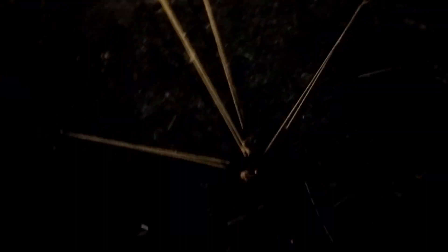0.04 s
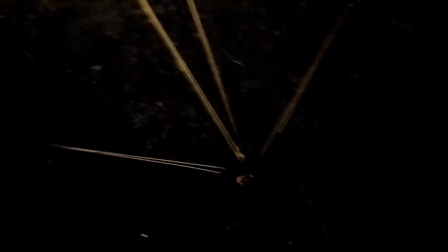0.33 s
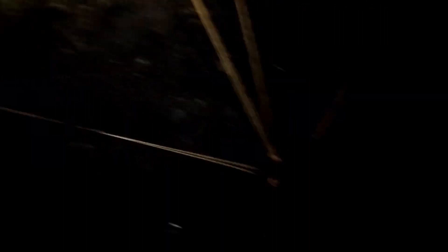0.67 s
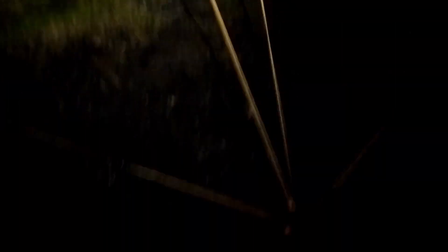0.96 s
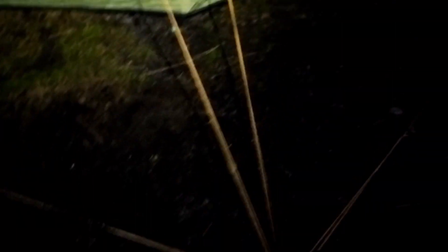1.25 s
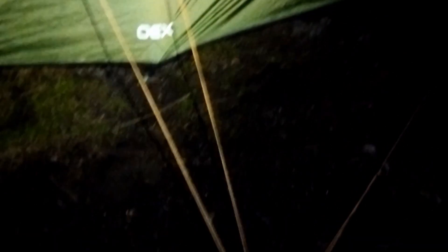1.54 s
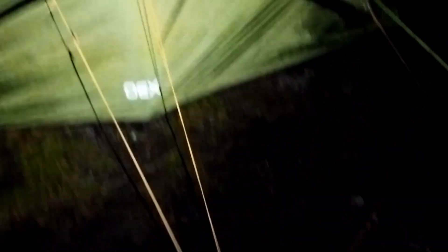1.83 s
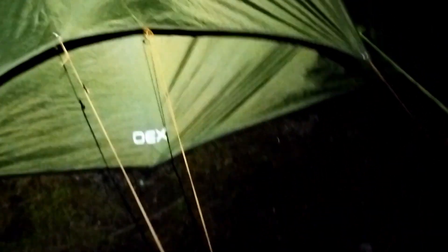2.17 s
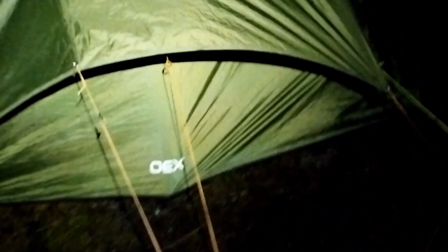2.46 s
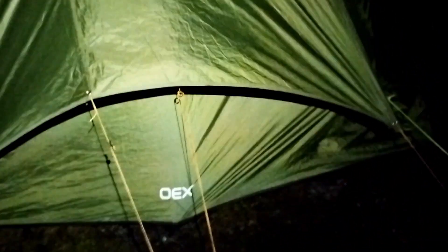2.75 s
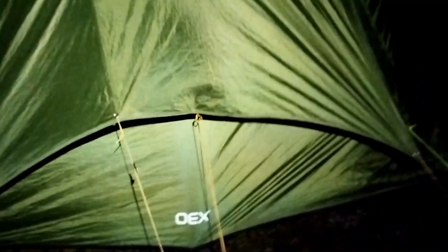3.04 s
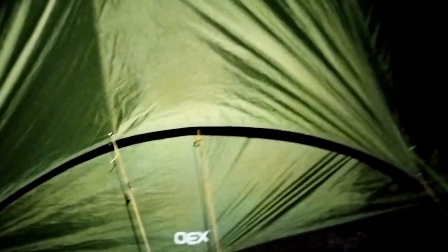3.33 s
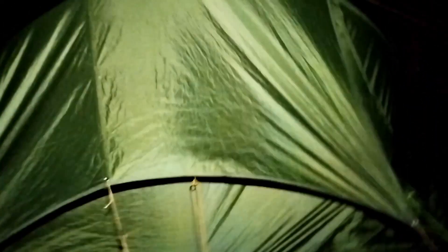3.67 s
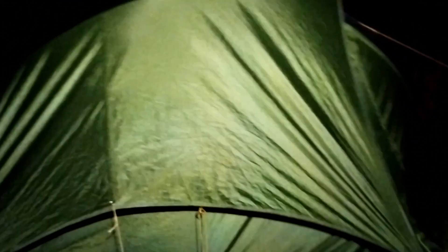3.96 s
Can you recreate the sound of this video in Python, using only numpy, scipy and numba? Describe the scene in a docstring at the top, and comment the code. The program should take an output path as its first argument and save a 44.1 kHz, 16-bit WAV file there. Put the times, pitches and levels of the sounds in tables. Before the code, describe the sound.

Tent fabric flaps and snaps in strong wind that buffets the microphone.

```python
"""Tent fabric flaps in a night gale. Each flap is a dull thump plus a burst of tiny snaps that travel
through the sheet as falling chirps. Taut creases crack or zip, the slack cloth crinkles, and the weave
hisses on sharp snaps. Eddies buffet the microphone, hardest in the first second, over a low wind
rumble, and a fast limiter holds the peaks down."""
import sys
import numpy as np
from scipy import signal
from scipy.fft import rfft, irfft, next_fast_len
from scipy.io import wavfile
from scipy.ndimage import uniform_filter1d, minimum_filter1d
from numba import njit

SR = 44100
rng = np.random.default_rng(int(sys.argv[2]) if len(sys.argv) > 2 else 0)


def generate_wav(sig):
    """Save sig (samples, or channels by samples) to the path in sys.argv[1] as 16-bit PCM at SR."""
    pcm = np.round(np.clip(np.atleast_2d(sig).T, -1, 1) * 32767).astype(np.int16)
    wavfile.write(sys.argv[1], SR, pcm)


N = 176400
SNAP_SPREAD, SNAP_ORDER = 0.4, 3.76  # pitch spread in natural-log units; higher order = narrower band


def flaps(snap_trim_db=2.5, thump_trim_db=-2.5):
    """Every flap fires a run of snaps and thumps the air."""
    # flaps of the sheet: t/s, length/s, snap level/dB, snap f/Hz, thump level/dB
    hits = [(0.01, 0.028, -26, 1700, -29), (0.041, 0.1, -38, 1970, -27.5), (0.166, 0.081, -45, 2130, -36),
            (0.279, 0.038, -42.5, 1900, -30), (0.386, 0.024, -42.5, 2050, -30.5),
            (0.509, 0.04, -34, 1900, -30), (0.601, 0.018, -30, 1690, -31), (0.658, 0.026, -34.5, 1950, -25),
            (0.713, 0.024, -34, 1730, -31), (0.747, 0.048, -32, 2240, -34), (0.804, 0.12, -33.5, 2300, -26),
            (0.948, 0.021, -25.5, 2100, -24), (0.978, 0.049, -34.5, 2260, -31),
            (1.038, 0.051, -33, 1950, -28), (1.188, 0.039, -35.5, 1670, -23.5),
            (1.312, 0.047, -27.5, 2570, -33.5), (1.377, 0.059, -26.5, 3000, -50),
            (1.448, 0.093, -30.5, 3000, -52), (1.636, 0.01, -24, 2240, -39),
            (1.664, 0.025, -25.5, 2400, -49), (1.744, 0.037, -33.5, 1470, -49),
            (1.806, 0.031, -29.5, 2070, -25.5), (1.826, 0.034, -25, 3400, -37),
            (1.896, 0.013, -27, 2920, -54), (2.015, 0.015, -26, 2410, -26), (2.055, 0.044, -30, 2280, -28),
            (2.124, 0.01, -26.5, 2400, -30), (2.172, 0.094, -28.5, 2230, -32.5),
            (2.281, 0.032, -22, 3220, -28), (2.32, 0.039, -28, 2070, -35), (2.372, 0.028, -28, 2670, -38),
            (2.457, 0.011, -27, 2000, -26.5), (2.498, 0.023, -27.5, 2700, -36),
            (2.616, 0.018, -27.5, 1300, -25), (2.637, 0.017, -25.5, 2950, -53),
            (2.756, 0.011, -10.5, 2670, -20), (2.817, 0.013, -25.5, 2110, -46),
            (2.868, 0.011, -27.5, 1220, -44), (3.173, 0.026, -32, 1960, -48),
            (3.316, 0.0046, -26, 1680, -23.5), (3.351, 0.017, -32.5, 1670, -30.5),
            (3.438, 0.012, -31, 1980, -30.5), (3.456, 0.017, -28.5, 3870, -36),
            (3.57, 0.016, -29, 3970, -38.5), (3.609, 0.039, -33, 2450, -38.5),
            (3.66, 0.012, -30, 3460, -49), (3.718, 0.053, -33, 3460, -38), (3.864, 0.02, -28, 2710, -29.5),
            (3.956, 0.018, -27, 2500, -32)]
    # thump spectrum of the slack sheet: f/Hz, level/dB
    thump_eq = [(60, -25), (150, -9), (330, -4), (800, -2), (1300, -10.5), (2100, -34), (8000, -77)]
    t = np.arange(N) / SR
    snaps, thump_env = np.zeros(N), np.zeros(N)
    for start, length, db, hz, thump_db in hits:
        snaps += burst(start, length, db + snap_trim_db, hz, SNAP_SPREAD, SNAP_ORDER)
        span = slice(int(start * SR), int((start + 2 * length + .1) * SR))
        thump_env[span] += undb(thump_db + thump_trim_db) * flap_envelope(t[span] - start, length)
    return snaps + thump_env * steady(colour(rng.standard_normal(N), thump_eq), window=600)


def flap_envelope(age, length, attack_s=0.0032, release_s=0.0026, tail_db=-18, tail_s=0.017):
    """Quick attack, hold, quick release and a faint tail."""
    after = np.maximum(age - length, 0)
    tail = undb(tail_db)
    decay = (1 - tail) * np.exp(-after / release_s) + tail * np.exp(-after / tail_s)
    return np.clip(age / attack_s, 0, 1) * decay


def burst(start, length, db, hz, spread, order, per_s=1100):
    """A shuddering run of grains, with the energy of rms level db held for its length."""
    age, gains, pitch = scatter(per_s, scatter_db=5.5, spread=spread, count=204)
    gains = gains * flap_envelope(age, length) * shudder(len(age), per_s)
    gains = gains * undb(db) * np.sqrt(length * SR / np.sum(gains ** 2))
    return grains(start + age, hz * pitch, gains, order)


def shudder(count, grains_per_s, flutter_hz=111.8, depth_db=4.5):
    """The cloth tightens and slackens in uneven cycles, so snaps come in clusters."""
    cycles = np.cumsum(rng.exponential(size=count)) * flutter_hz / grains_per_s
    return undb(depth_db * np.sin(2 * np.pi * cycles))


def cracks(count=12, length_s=.0062, trim_db=-2.5):
    """A taut crease lets go all at once: a dozen snaps within a few milliseconds."""
    # single cracks: t/s, level/dB, f/Hz
    hits = [(.062, -23, 2000), (.289, -29.5, 1810), (0.583, -37, 1410), (0.933, -17, 1860),
            (1.226, -22, 2250), (1.257, -23, 1300), (1.279, -17.5, 1680), (1.288, -21.5, 2400),
            (1.301, -19.5, 3040), (1.723, -21.5, 1920), (1.946, -22, 1950), (1.982, -23, 2190),
            (2.116, -25, 2600), (2.476, -24, 3020), (2.679, -23, 1510), (2.727, -29.5, 2000),
            (2.796, -23, 2300), (2.853, -25, 1260), (2.896, -37, 1540), (2.953, -23.5, 1200),
            (2.996, -24.5, 650), (3.1, -20.5, 2440), (3.185, -27, 2300), (3.28, -22.5, 2330),
            (3.294, -26.5, 2730), (3.333, -20, 1760), (3.835, -19, 3100)]
    out = np.zeros(N)
    for time, db, hz in hits:
        age, gains, pitch = scatter(count / length_s, scatter_db=0.67, spread=SNAP_SPREAD, count=count)
        crack = grains(time + age, hz * pitch, gains * np.exp(-age / length_s), order=5.35)
        out += crack * undb(db + trim_db) * np.sqrt(length_s * SR / np.sum(crack ** 2))
    return out


def sheet_chirp(snaps):
    """High bending waves cross the sheet first, smearing each snap into a falling chirp."""
    return colour(snaps, [(20, 0), (20000, 0)], lag_s=.0026)


def zips(width_s=0.00067, fall_oct_per_s=79, rough_hz=450, trim_db=0.5):
    """A taut crease flicks over and rings roughly for a few cycles while its pitch drops."""
    # zips at their peak: t/s, level/dB, f/Hz
    hits = [(2.798, -16, 3910), (3.296, -14.5, 3400), (3.443, -10, 3790), (3.447, -15, 4400),
            (3.488, -15, 6680), (3.513, -16.5, 6550), (3.587, -14, 6850), (3.678, -17.5, 6300),
            (3.688, -16.5, 6100)]
    out, offsets = np.zeros(N), np.arange(-256, 256)
    age = offsets / SR
    for time, db, hz in hits:
        wander = np.cumsum(rng.standard_normal(len(age))) * np.sqrt(2 * np.pi * rough_hz / SR)
        sweep = 2 * np.pi * np.cumsum(hz * 2 ** (-fall_oct_per_s * age)) / SR
        ring = np.sin(sweep + uniform_filter1d(wander, size=8))
        envelope = np.hanning(len(age)) / np.cosh(age / width_s)
        out[int(time * SR) + offsets] += undb(db + trim_db) * ring * envelope
    return out


def crinkle(folds_per_s=1500, swishes_per_s=110, swish_db=6, swish_pitch=0.13):
    """Small creases fold in the slack sheet, in swishes that get louder and brighter together."""
    # soft crinkling between flaps: t/s, level/dB, f/Hz
    ride = [(0, -25.5, 1350), (.15, -43, 1770), (.36, -51.5, 1900), (.47, -41.5, 725), (.9, -37.5, 1500),
            (1.085, -37, 1280), (1.105, -43.5, 390), (1.28, -38.5, 1190), (1.56, -36, 1910),
            (1.6, -37.5, 800), (1.66, -39.5, 1570), (2.38, -37, 1620), (2.56, -45, 900), (2.95, -30, 1470),
            (3.0, -43, 930), (3.21, -37.5, 1420), (3.25, -43, 710), (3.34, -44, 1350), (3.5, -34, 3520),
            (3.79, -44.5, 3300), (3.91, -41.5, 1470), (4, -32, 2300)]
    times, gains, pitch = scatter(folds_per_s, scatter_db=3.0, spread=.4, count=6120)
    times = times + 4 * rng.standard_normal(len(times)) / folds_per_s
    swish_points = np.clip(rng.standard_normal(len(times)), -2, 2)
    swish = np.interp(times * swishes_per_s, np.arange(len(times)), swish_points)
    hz = curve(ride, times, column=2) * pitch * np.exp(swish_pitch * swish)
    folds = grains(times, hz, gains * undb(swish_db * swish), order=12)
    return steady(folds, window=2400) * undb(curve(ride, np.arange(N) / SR))


def weave_rub(fabric, above_hz=5750):
    """The weave rubs on every sharp snap: a hiss keyed by the fabric's top end."""
    # hiss spectrum: f/Hz, level/dB
    hiss_eq = [(1500, -51), (4000, 5.5), (7000, 6), (10000, -2), (16000, -18)]
    treble = signal.sosfilt(signal.butter(8, above_hz, "high", fs=SR, output="sos"), fabric)
    hiss = colour(rng.standard_normal(N), hiss_eq)
    return loudness(treble, window=70) * hiss / np.sqrt(np.mean(hiss ** 2))


def buffet(trim_db=-2):
    """Eddies thud on the microphone; the fastest gusts rush across it, mostly at a higher pitch."""
    # strength of the eddies: t/s, level/dB
    ride = [(0, -45), (.17, -30.5), (.38, -30.5), (.53, -26.5), (.95, -27), (1.12, -36), (1.27, -35.5),
            (1.5, -36.5), (2.7, -41), (3.0, -34.5), (3.42, -36), (3.6, -41)]
    # eddy pitch, higher in faster air: t/s, f/Hz
    eddy_pitch = [(0, 436), (.3, 274), (.5, 490), (.95, 468), (1.13, 386), (4, 330)]
    # rushing gusts: t/s, length/s, level/dB, f/Hz
    gusts = [(0.255, 0.014, -25.5, 684), (0.446, 0.022, -26.5, 820), (0.479, 0.035, -24.5, 945),
             (0.592, 0.031, -24.5, 1040), (0.739, 0.018, -22, 1030), (1.17, 0.022, -29.5, 292),
             (3.071, 0.024, -27, 1150)]
    times, gains, pitch = scatter(per_s=900, scatter_db=9.5, spread=0.056, count=4800)
    eddies = grains(times, curve(eddy_pitch, times) * pitch, gains, SNAP_ORDER, reach=256)
    thuds = steady(eddies, window=1400) * undb(curve(ride, np.arange(N) / SR) + trim_db)
    return thuds + sum(burst(*gust, spread=0.086, order=14) for gust in gusts)


def rumble(trim_db=0.23):
    """Slow pressure swings of the wind lay a low bed under the tent."""
    # rumble spectrum: f/Hz, level/dB
    rumble_eq = [(15, -40), (30, -11), (45, -11), (62, -2), (95, 2), (170, -2), (240, -10.5), (400, -32),
                 (1200, -37), (16000, -71.5)]
    # swell of the wind: t/s, level/dB
    ride = [(0, -34.5), (.14, -39), (.24, -30), (.36, -32.5), (.9, -35), (1.15, -37), (1.35, -42),
            (1.6, -39), (2.88, -39.5), (3.0, -32.5), (3.17, -37.5), (3.46, -33.5), (3.53, -48.5),
            (4, -36.5)]
    air = steady(colour(rng.standard_normal(N), rumble_eq), window=2400)
    return air * undb(curve(ride, np.arange(N) / SR) + trim_db)


def grains(times, hz, gains, order, reach=192, ring_hz=2590):
    """Sum of wavelets, reach samples each side; above ring_hz they ring for more and more cycles."""
    index = (times * SR).astype(int)[:, None] + np.arange(-reach, reach)
    hz = np.minimum(hz, SR / 4)[:, None]
    ringing = order / 2 * (1 + (hz / ring_hz) ** 2)
    scaled_age = 2 * np.pi * hz * (index / SR - times[:, None]) / ringing
    envelope = (1 + scaled_age ** 2) ** (-(ringing + 1) / 2)
    phase = (ringing + 1) * np.arctan(scaled_age) + rng.uniform(0, 2 * np.pi, (len(times), 1))
    wave = envelope * np.cos(phase) * np.hanning(2 * reach)
    wave = wave * (gains / np.sqrt((wave ** 2).sum(1) + 1e-18))[:, None]
    inside = (index >= 0) & (index < N)
    return np.bincount(index[inside], wave[inside], N)


def scatter(per_s, scatter_db, spread, count, group=6):
    """Uneven grain times, gains and pitch ratios; each group spans the whole pitch range."""
    times = (np.arange(count) + rng.random(count)) / per_s
    slots = rng.random((count // group, group)).argsort(axis=1).ravel()
    share = (slots + rng.random(count)) / group
    log_pitch = np.arcsin(2 * share - 1) * np.sqrt(2)
    gains = undb(scatter_db * np.clip(rng.standard_normal(count), -2, 2))
    return times, gains, np.exp(spread * log_pitch)


def colour(x, points, lag_s=0):
    """EQ through (f/Hz, level/dB) points; lag_s scales bending-wave dispersion, delaying the lows."""
    size = next_fast_len(N + 8192)
    hz, points = np.arange(size // 2 + 1) * SR / size + 1e-6, np.array(points)
    gain = undb(np.interp(np.log(hz), np.log(points[:, 0]), points[:, 1]))
    phase = 2 * np.pi * lag_s * (2 * np.sqrt(3000 * (hz + 500)) - hz)
    return irfft(rfft(x, size) * gain * np.exp(-1j * phase), size)[:N]


def loudness(x, window):
    """Running rms, smoothed twice over window samples."""
    return np.sqrt(np.abs(uniform_filter1d(uniform_filter1d(x ** 2, window), window)) + 1e-12)


def steady(x, window):
    """Even out the loudness, leaving the quick grain."""
    return x / loudness(x, window)


def curve(rows, t, column=1):
    """One column of a time table, joined by straight lines."""
    rows = np.array(rows)
    return np.interp(t, rows[:, 0], rows[:, column])


def undb(db):
    """Decibels to gain."""
    return 10 ** (np.asarray(db) / 20)


@njit
def peak_follow(x, release):
    """Jump to each peak, then decay by the factor release per sample."""
    out, held = np.empty(len(x)), 0.
    for i in range(len(x)):
        held = max(x[i], held * release)
        out[i] = held
    return out


def limiter(x, ceiling_db=-12, release_s=0.0043):
    """Duck each peak, with the gain smoothed over about a millisecond."""
    peak = peak_follow(np.abs(x), np.exp(-1 / (release_s * SR)))
    gain = np.minimum(1, undb(ceiling_db) / (peak + 1e-9))
    return x * uniform_filter1d(minimum_filter1d(gain, size=45), size=45)


def scene():
    """The tent fabric up front, with wind on the microphone underneath, in mono."""
    fabric = sheet_chirp(flaps() + cracks()) + crinkle()
    return (fabric + weave_rub(fabric) + zips() + buffet() + rumble())[None]


def record(dry):
    """Microphone colour, a fast limiter and a steep top cut."""
    # microphone response, notched below its presence peak: f/Hz, level/dB
    mic_eq = [(1000, 0), (1500, -2.5), (2000, -5), (2500, -8.5), (2800, -3), (3100, 2), (3900, 0),
              (5200, -0.5), (6600, 0.5), (8500, 1), (14500, 8)]
    top_cut = signal.ellip(10, .2, 80, 16100, fs=SR, output="sos")
    return signal.sosfilt(top_cut, limiter(colour(dry[0], mic_eq)))[None]


dry = scene()
out = record(dry)
generate_wav(out)
```